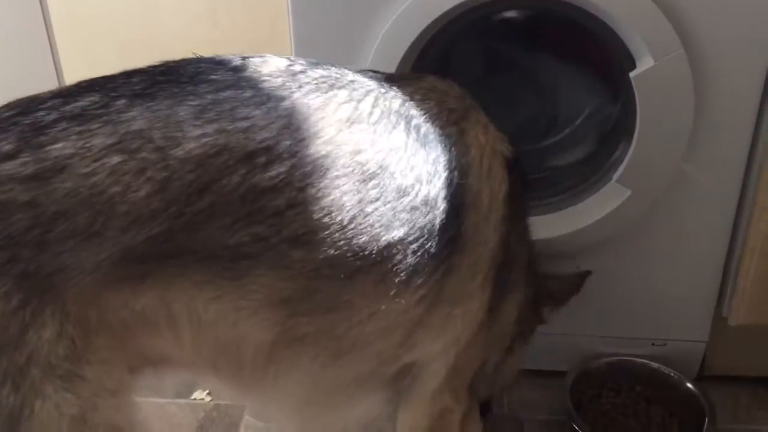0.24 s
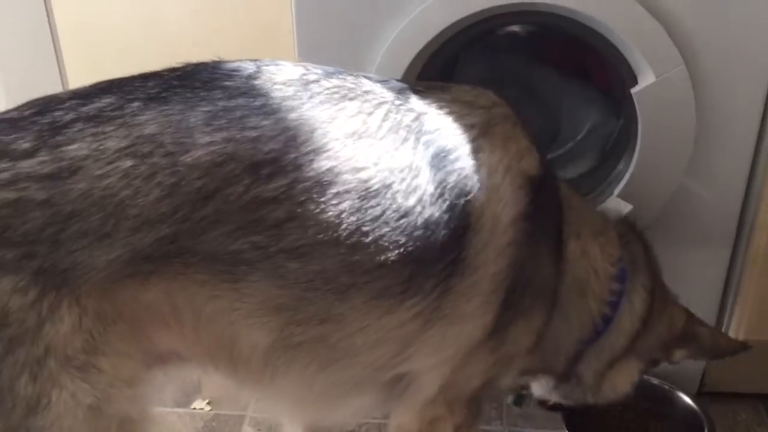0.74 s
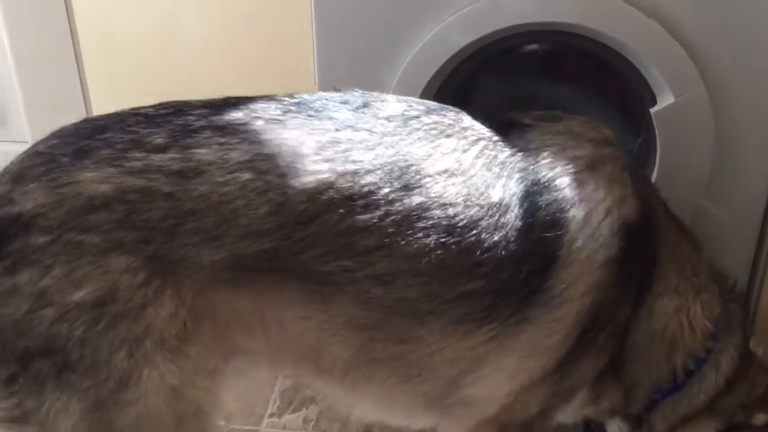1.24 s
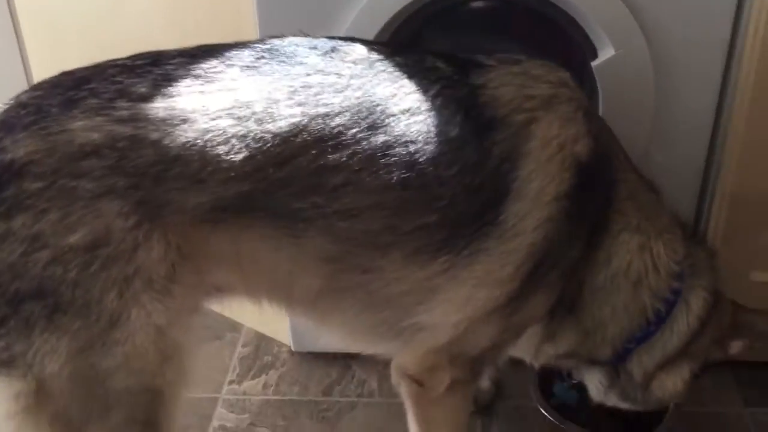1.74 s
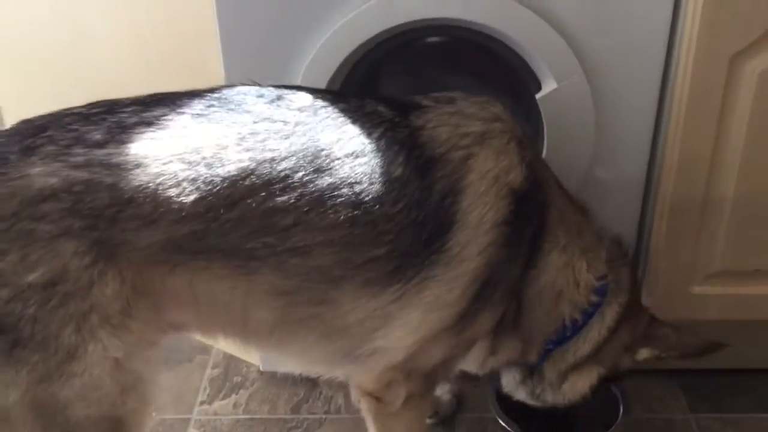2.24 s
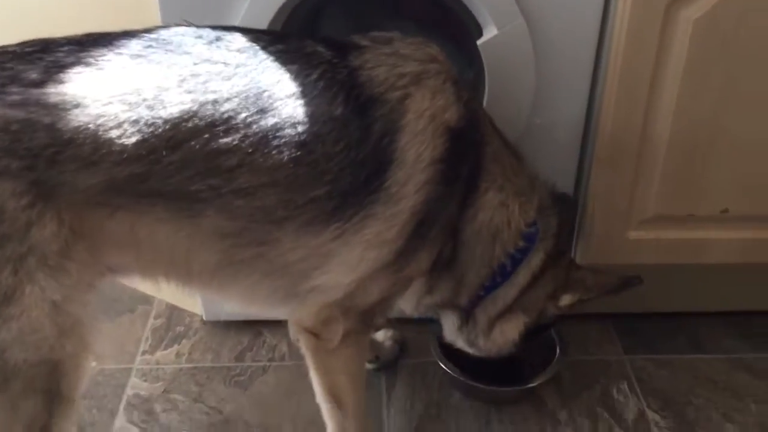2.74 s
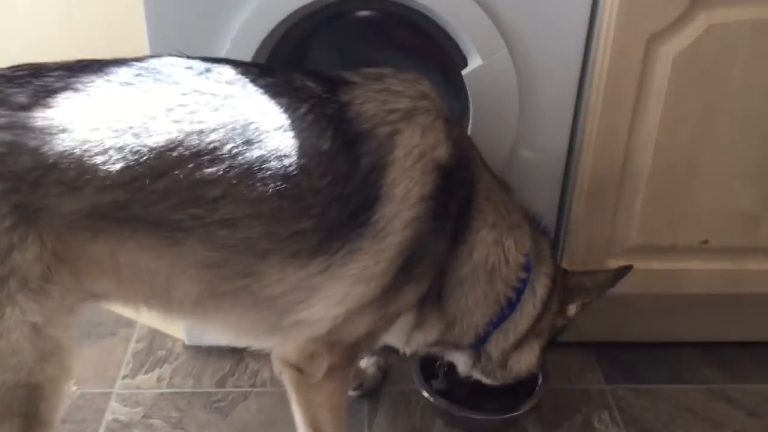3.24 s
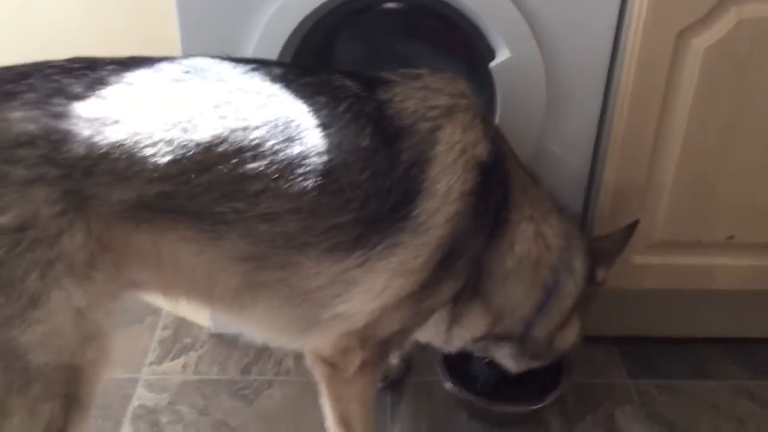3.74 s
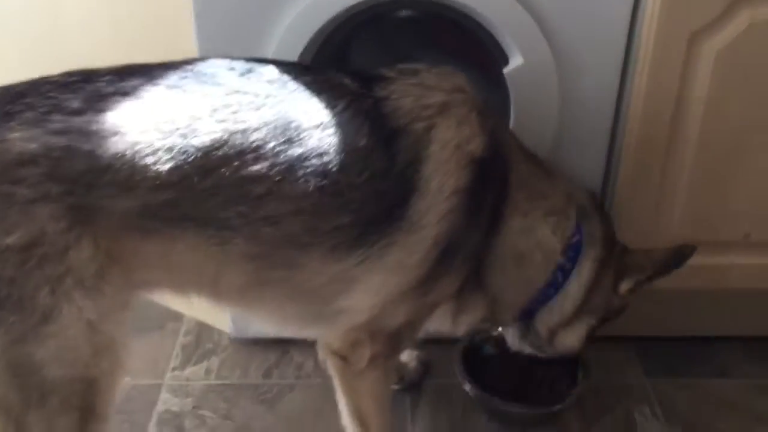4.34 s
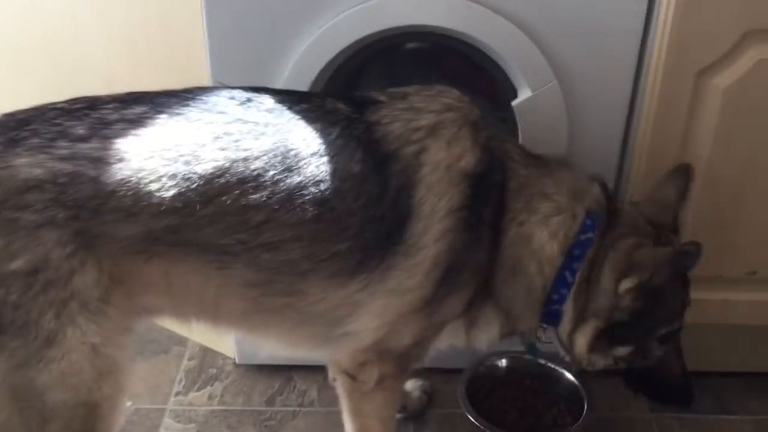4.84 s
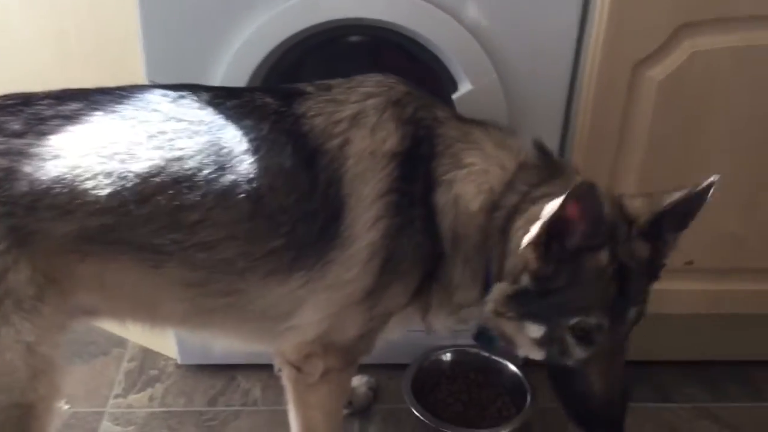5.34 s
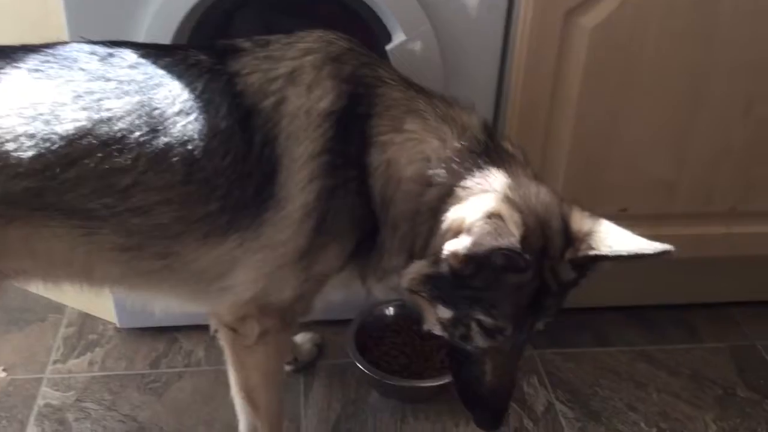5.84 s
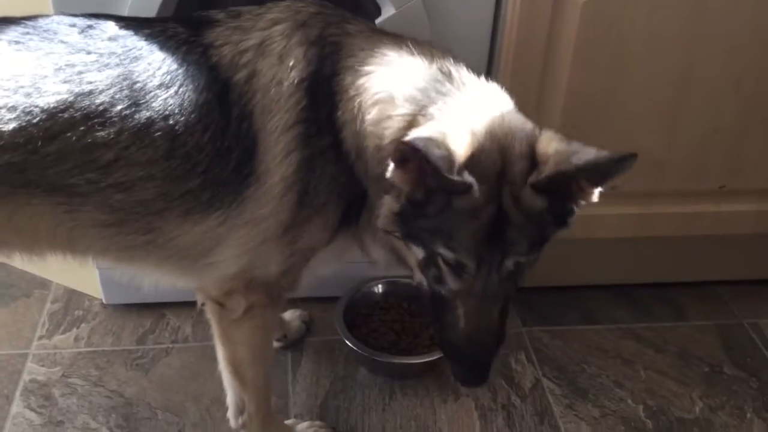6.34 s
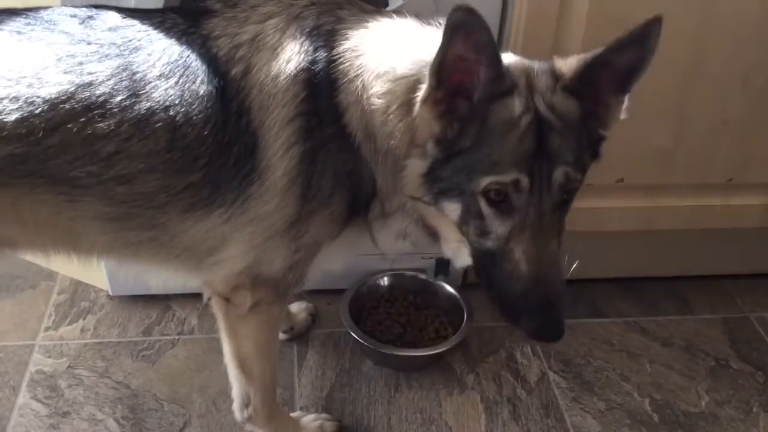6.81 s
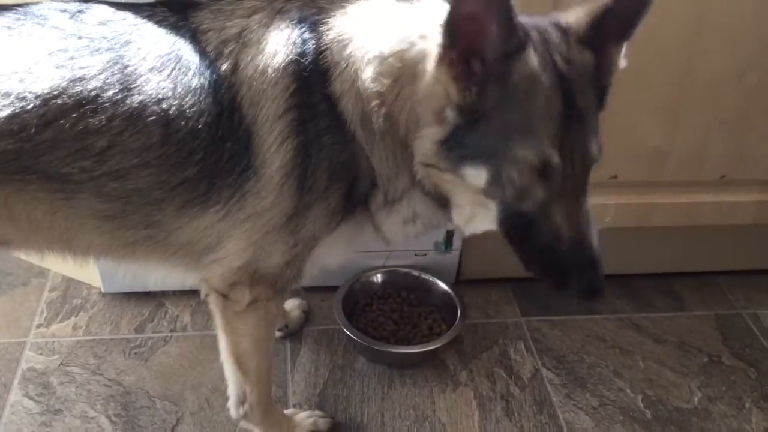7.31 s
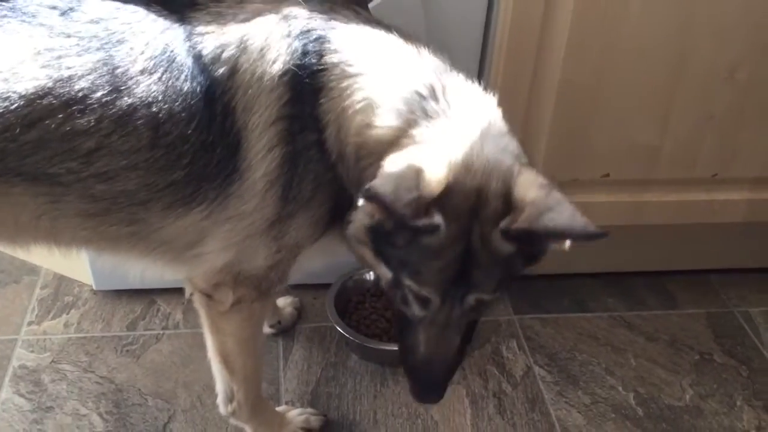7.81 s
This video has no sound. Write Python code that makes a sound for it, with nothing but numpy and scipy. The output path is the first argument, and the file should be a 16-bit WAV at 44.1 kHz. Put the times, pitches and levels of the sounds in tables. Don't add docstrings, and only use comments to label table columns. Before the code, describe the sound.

A close phone pickup in a small reverberant tiled kitchen with very faint fridge hum. From 0 to 0.6 s fur rustles, claws tick and a thin collar tag jingles very high and bright, strongest around 0.3 to 0.5 s. Small dry taps hit tile near 0.95 s; a soft paw pat lands at 1.35 s, and a faint, steady, high nasal whine lasts until about 2 s. From 2.1 to 4.2 s a muzzle pushes dry kibble round a steel bowl, an irregular, ringing, gritty clatter densest after 3.3 s. From 4.5 s, crunches turn low and hollow in the mouth. At 5.39 s a dropped piece cracks very loudly on tile, with smaller bounces from 5.66 to 5.97 s. Brittle crunches come around 6.1 to 6.35 s, a strong hissy snort at 6.45 s, a wheeze near 7 s, a weaker snort at 7.15 s, then quiet crunching around 7.7 s.

```python
import sys
import numpy as np
from scipy import signal
from scipy.fft import rfft, irfft
from scipy.io import wavfile
from scipy.ndimage import uniform_filter1d

SR = 44100
rng = np.random.default_rng(int(sys.argv[2]) if len(sys.argv) > 2 else 0)


def field_ratio(decibels):
    return 10 ** (np.asarray(decibels, dtype=float) / 20)


def inscribe(sig):
    pcm = np.round(np.clip(np.atleast_2d(sig).T, -1, 1) * 32767)
    wavfile.write(sys.argv[1], SR, pcm.astype(np.int16))


N = 355705


def evened(x):
    return x / np.sqrt(np.mean(x ** 2) + 1e-20)


def read(points, hz):
    f, value = np.transpose(points)
    return np.interp(np.log(hz + 1), np.log(f + 1), value)


def follow(rows):
    s, *columns = np.transpose(rows)
    at = np.arange(max(round(s[0] * SR), 0), min(round(s[-1] * SR), N))
    return at, [np.interp(at / SR, s, c) for c in columns]


def add(mix, s, sound):
    part = mix[..., round(s * SR):][..., :sound.shape[-1]]
    part += sound[..., :part.shape[-1]]


def causal(gain_db):
    log = np.log(field_ratio(np.maximum(gain_db, -100)))
    log = np.r_[log, log[-2:0:-1]]
    taps = np.fft.ifft(np.exp(np.conj(signal.hilbert(log)))).real[:1024]
    return taps / np.linalg.norm(taps)


def resonate(x, hz, width):
    turn = np.exp(2j * np.pi * np.cumsum(hz * np.ones(len(x))) / SR)
    r = np.exp(-np.pi * width / SR)
    return 2 * (turn * signal.lfilter([1 - r], [1, -r], x / turn + 1e-18)).real


def grit(per_s, spread_db, size):
    height = field_ratio(spread_db * np.minimum(rng.exponential(1, size), 3.0)) * rng.standard_normal(size)
    return evened(height * (rng.random(size) < per_s / SR))


SWELL_DB = 26


def gesture(s, rise, fall, db, hz=0, sag=(0, 0)):
    reach = 2.6
    early, late = reach * rise, reach * fall
    low_db = db - reach * SWELL_DB
    start = (s - early, low_db, max(hz + sag[0] * early, 100))
    end = (s + late, low_db, max(hz - sag[1] * late, 100))
    return [start, (s, db, hz), end]


def tilt(hz, low_db, top_db):
    low = 1 / (1 + (hz / 1100) ** 3)
    top = 1 / (1 + (6500 / (hz + 1)) ** 5)
    return low * low_db + top * top_db


def knocks(events, spectrum, crumb, crumble, ring_db, lift_db, thud_lift_db, snap_lift_db):
    out, t, hz = np.zeros(N), np.arange(1600) / SR, np.fft.rfftfreq(2048, 1 / SR)
    size = (len(events), 1600)
    crumbs = rng.standard_normal(size) * field_ratio(3.06 * np.minimum(rng.exponential(1, size), 2))
    rings = 1500 * 5 ** rng.random((len(events), 2, 1))
    for (s, db, thud_db, snap_db, break_db), grains, ring_hz in zip(events, crumbs, rings):
        swell_s = (0.07 + 0.026 * max(-break_db, 0)) * crumble
        blow = crumb * grains * np.exp(-t / crumble) * (1 - np.exp(-t / swell_s))
        blow *= 1 + 0.9 * field_ratio(min(break_db, 12)) * np.exp(-t / 0.002)
        blow[0] = field_ratio(min(break_db, 3))
        ring = ring_db * (1 / (1 + ((hz - ring_hz) / (0.038 * ring_hz)) ** 2)).sum(0)
        ends = tilt(hz, thud_db + thud_lift_db, snap_db + snap_lift_db)
        colour = causal(read(spectrum, hz) + ring + ends)
        add(out, s, field_ratio(db + lift_db) * signal.fftconvolve(blow, colour))
    return out


def pats(rows):
    out, t = np.zeros(N), np.arange(3000) / SR
    for s, db, hz, t60 in rows:
        onset = 1 - np.exp(-t / 0.00025)
        add(out, s, field_ratio(db + 8.5 - 60 * t / t60) * np.sin(2 * np.pi * hz * t) * onset)
    return out


def cavity(rows, width, clicks):
    at, (db, hz) = follow(rows)
    sound = resonate(resonate(clicks[at], hz, width), hz, 2 * width)
    return at[0] / SR, field_ratio(db) * evened(sound) * signal.windows.tukey(len(at), .05)


# f/Hz, level/dB
ROOM_TONE = [(25, -37), (60, -17.5), (130, -7.5), (400, -15), (1500, -11), (3000, -41.5), (16000, -32.5)]


def air():
    hz = np.fft.rfftfreq(N, 1 / SR)
    hiss = evened(irfft(rfft(rng.standard_normal(N)) * field_ratio(read(ROOM_TONE, hz)), N))
    waver = 1 + .1 * evened(uniform_filter1d(rng.standard_normal(N), 3000))
    hum = np.sqrt(2) * field_ratio(-76) * waver * np.sin(2 * np.pi * 79.3 * np.arange(N) / SR)
    return field_ratio(-77) * hiss + hum


# peak t/s, rise t/s, fall t/s, level/dB
BODY_BUMPS = [(0.599, 2.7, 1, -57), (1.6, 0.42, 0.32, -78), (2.11, 0.077, 0.25, -57), (3.75, .4, 0.43, -60),
              (4.468, 0.096, 0.62, -61), (5.43, 0.2, 0.6, -53.5), (5.9, 0.39, 0.099, -48),
              (6.17, 0.12, 0.85, -47.5), (6.839, 0.23, 0.86, -52.5), (7.951, 1.08, 0.11, -62)]


def body():
    power = np.zeros(N)
    for row in BODY_BUMPS:
        at, (db, _) = follow(gesture(*row))
        add(power, at[0] / SR, field_ratio(2 * db))
    lumps = resonate(resonate(grit(540, 2.2, size=N), 165, 130), 240, 97)
    return field_ratio(-4.5) * np.sqrt(power) * evened(lumps)


# peak t/s, rise t/s, fall t/s, effort level/dB, crispness level/dB
FUR_BRUSHES = [(0.01, 0.1, 0.63, -59.5, -2.5), (0.087, 0.0058, 0.39, -55, -9), (0.4, 0.2, 0.65, -57.5, 1.5),
               (0.801, 0.33, 0.14, -59, -11), (1.165, 0.031, 0.1, -52, -10),
               (1.319, 0.056, 0.031, -62, 2.5)]
# peak t/s, rise t/s, fall t/s, effort level/dB, crispness level/dB
BOWL_ROOTING = [
    (2.099, 0.038, 0.25, -50.5, -15),
    (2.369, 0.025, 0.75, -39.5, -8.5),
    (2.51, 0.17, 1, -42.5, -18.5),
    (3.17, 0.32, 0.56, -42.5, -36),
    (3.367, 0.24, 0.54, -35.5, -9),
    (3.732, 0.17, 0.29, -37.5, -12),
    (4.068, 0.03, 0.1, -33, -43),
    (4.19, 0.55, 0.15, -41.5, -15.5),
]
# peak t/s, rise t/s,
# fall t/s, effort level/dB, crispness level/dB
MOUTH_GRINDING = [(4.6, 0.29, 0.28, -54.5, 0), (4.78, 0.052, 0.064, -42, -54.5),
                  (4.954, 0.01, 0.18, -39.5, -19), (5.16, 0.22, 0.095, -42.5, -52),
                  (5.39, 0.2, 1.4, -53.5, -11), (5.72, .05, 0.29, -56.5, 9), (5.96, .15, 0.4, -47, -15),
                  (6.134, 0.012, 0.14, -58, -26), (6.289, 0.12, 0.02, -40.5, -34),
                  (6.782, 0.14, 0.13, -62, 1), (6.702, 0.013, 0.18, -47.5, -24),
                  (6.97, 0.03, 0.12, -51, -34), (7.08, 0.05, 0.022, -54.5, -61),
                  (7.22, 0.013, 0.49, -58.5, -17), (7.234, 0.065, 0.048, -60.5, 11),
                  (7.36, .1, 0.15, -75, 7), (7.47, 0.3, 0.2, -73.5, 10), (7.03, 0.15, 0.29, -71, 6),
                  (7.7, 0.15, 0.25, -60, -11.5)]


def strokes(hz, t):
    power = 1e-14
    dip = np.exp(-(np.log((hz[:, None] + 1) / 2300) / 0.17) ** 2)
    stages = ((FUR_BRUSHES, -2.5, -7), (BOWL_ROOTING, -12.5, 0), (MOUTH_GRINDING, -3, 0))
    for rows, dull_db, dip_db in stages:
        for s, rise, fall, db, crisp_db in rows:
            fading = abs((t - s) / fall) ** 1.36
            lost_db = SWELL_DB * np.where(t < s, (s - t) / rise, fading)
            shed_db = np.minimum(lost_db, 30)
            low_db = dull_db + 4 + 0.7309 * shed_db
            top_db = crisp_db + 4 + 0.3648 * shed_db
            colour_db = tilt(hz[:, None], low_db, top_db)
            power = power + field_ratio(2 * (db - np.minimum(lost_db, 150) + colour_db + dip_db * dip))
    return power


# f/Hz, level/dB
GRAIN_COLOUR = [(90, -52), (240, -2), (963, -8.5), (1790, -4), (2120, -6.5), (8510, -14), (15100, -24),
                (16500, -47.5)]


def rustle():
    hz, t, z = signal.stft(grit(7000, 2.2, size=N), SR, nperseg=256)
    shape_db = read(GRAIN_COLOUR, hz)
    shape_db = shape_db - 10 * np.log10(np.mean(field_ratio(2 * shape_db)))
    patches = uniform_filter1d(rng.standard_normal(z.shape), size=9, axis=0)
    patches = evened(uniform_filter1d(patches, size=6, axis=1))
    clumps = evened(uniform_filter1d(rng.standard_normal(len(t)), size=4))
    gain_db = -3.0 + shape_db[:, None] + 2.6 * patches + 1.2 * clumps
    coarse = np.repeat(strokes(hz[::4], t), 4, axis=0)[:len(hz)]
    return signal.istft(z * field_ratio(gain_db) * np.sqrt(coarse), SR, nperseg=256)[1][:N]


# t/s, peak level/dB, f/Hz, t60/s
PAW_PATS = [
    (0.031, -46, 383, 0.017),
    (1.347, -40.5, 610, 0.021),
    (7.096, -44.5, 1750, 0.016),
]


def paws():
    return pats(PAW_PATS)


# f/Hz, level/dB
CLAW_COLOUR = [(90, -42), (260, 2), (1500, -11), (2600, -17.5), (4000, -8), (8500, -14), (15300, -19.5),
               (16500, -54)]
# t/s, peak level/dB, thud level/dB, snap level/dB, first break level/dB
CLAW_TICKS = [(0.067, -46.5, -46, -29, 4), (0.1007, -41, -36, -17, -1), (0.1715, -36.5, -73, -6, 6),
              (0.2743, -27, -68, -16, -27), (0.3405, -32.5, -60, 9, 0), (0.392, -33, -30.5, 4, 6),
              (0.4314, -33, -55.5, -6, 1.5), (0.44, -28.5, -56.5, 4, -2.5), (0.4937, -33.5, -33, 8, 2),
              (0.605, -46, -46, -6, 2), (0.724, -45, -4, -47, -2.5), (0.7705, -46.5, 3, -51, 9),
              (0.789, -47, -9, -29, 9), (0.8057, -39.5, 11, 4, 4.5), (1.141, -33, -46, -6, -18),
              (1.162, -35.5, -50, -23, -10), (1.2394, -56, -30, -20, 20), (1.508, -57, -35, -34, -3),
              (1.7481, -56, -50, -19, 7), (1.935, -57.5, -23, -8, 4.5)]


def ticks():
    return knocks(CLAW_TICKS, CLAW_COLOUR, crumb=0.19, crumble=0.0099, ring_db=4.0,
                  lift_db=4.0, thud_lift_db=1.5, snap_lift_db=13.5)


# t/s, peak level/dB, lower mode level/dB, deep modes level/dB
TAG_STRIKES = [(0.145, -47, 9, 11), (0.169, -42, 20, -8), (0.1775, -31, 11, 0), (0.2732, -31, 16, 15),
               (0.3402, -18.5, 7.5, -1.5), (0.393, -21, 13, -7), (0.4008, -22.5, 12.5, 5),
               (0.4317, -30.5, -2, 8), (0.44, -25, 12.5, 5), (0.4928, -16, 0, -13), (0.6005, -39.5, 8.5, 1),
               (0.735, -51, -5, -3.5), (0.8094, -52, 3, -2.5), (1.075, -62, -5, -2), (1.306, -48.5, 5, -2),
               (1.42, -67.5, 12, 5), (1.513, -62, -3.5, 9), (1.932, -64, -9, -4.5),
               (5.215, -56.5, 11, -3.5)]
# f/Hz, level/dB, t60/s
TAG_MODES = [(11780, 1, 0.18), (10410, -6.5, 0.11), (15140, 2.5, .07), (8500, -22.5, 0.33),
             (3770, -16.5, 0.078)]


def tag():
    out, t = np.zeros(N), np.arange(9000) / SR
    turns = rng.random((len(TAG_STRIKES), 11))
    rattle = 1 + 0.31 * evened(uniform_filter1d(rng.standard_normal(N), size=150))
    for (s, db, lower_db, deep_db), turn in zip(TAG_STRIKES, turns):
        top_db = -0.33 * max(db + 49.5, 0)
        own_levels = (0, lower_db, top_db, deep_db, deep_db)
        for k, ((hz, mode_db, t60), own_db) in enumerate(zip(TAG_MODES, own_levels)):
            hz = hz * (1 + 0.0047 * (turn[10] - .5))
            pair = np.sin(2 * np.pi * (hz * t + turn[k]))
            pair = pair + 0.26 * np.sin(2 * np.pi * (hz * 1.007 * t + turn[5 + k]))
            decay = field_ratio(db - 9.5 + mode_db + own_db - 60 * t / t60)
            add(out, s, decay * pair * (1 - np.exp(-t / 0.0019)))
    return out * rattle


# f/Hz, level/dB
TILE_COLOUR = [(100, -60.5), (350, -12), (794, -19.5), (2200, -12.5), (3300, -0.5), (5800, -3),
               (12500, -14.5), (16800, -41)]
# t/s, peak level/dB, thud and snap level/dB re peak, first break level/dB
TILE_DROPS = [(0.9355, -28.5, -28, -6.5, -1), (0.9478, -21.5, -21, 1, 3.5), (0.9601, -21.5, -19, -0.5, 0.5),
              (0.9686, -26, -24, -47, 8), (5.3872, -3, -18.5, -3, 2.5), (5.661, -27, -24.5, -10.5, -4),
              (5.6766, -9.5, -17, -18, 2.5), (5.683, -20, -21, -33, -11), (5.8221, -28, -7, -16, 1),
              (5.8391, -13, -20.5, -20.5, 1.5), (5.844, -22, -22, -22, -4), (5.9276, -17.5, -17, -20, -3),
              (5.966, -20, -31, -15, 2), (5.9715, -32, -11, -12, -13)]


def drops():
    return knocks(TILE_DROPS, TILE_COLOUR, crumb=0.014, crumble=0.0019, ring_db=0.5,
                  lift_db=10.0, thud_lift_db=25.0, snap_lift_db=5)


# t/s, level/dB of partials 1, 2 and 3
WHINE_PARTIALS = [(1.33, -70, -100, -105), (1.46, -79.5, -70, -77), (1.5, -71.5, -71, -73),
                  (1.56, -63.5, -66.5, -69.5), (1.65, -68, -64.5, -100), (1.74, -65, -75, -87.5),
                  (1.82, -62.5, -92.5, -105), (1.865, -64.5, -67, -105), (2.055, -76, -108, -105)]
# t/s, f/Hz, level/dB
SIDE_WHISTLES = [
    [(1.48, 2220, -115), (1.566, 2200, -67.5), (1.75, 2240, -76.5)],
    [(1.32, 2590, -77), (1.394, 2560, -65), (1.5, 2630, -101)],
    [(1.35, 2880, -71), (1.51, 2860, -78), (1.6, 2870, -74.5), (1.63, 2870, -89.5)],
    [(1.34, 5380, -69), (1.45, 5430, -81.5), (1.52, 5400, -82)],
]


def whine():
    out = np.zeros(N)
    for rows in (np.insert(WHINE_PARTIALS, 1, 2107, axis=1), *SIDE_WHISTLES):
        at, (hz, *levels) = follow(rows)
        wander_hz = 3.8 * evened(uniform_filter1d(rng.standard_normal(len(at)), 600))
        turns = np.cumsum(hz + wander_hz) / SR
        flutter = field_ratio(1.4 * evened(uniform_filter1d(rng.standard_normal(len(at)), size=900)))
        sound = np.zeros(len(at))
        for k, db in zip((1, 2, 3.04), levels):
            sound += np.sqrt(2) * field_ratio(db) * np.sin(2 * np.pi * k * turns)
        add(out, at[0] / SR, flutter * sound * signal.windows.tukey(len(at), .15))
    return out


# t/s, peak level/dB, thud level/dB, snap level/dB, first break level/dB
BOWL_CLACKS = [(2.0788, -54, -7, -19, 5), (2.0989, -42.5, -0.5, -15, 1.5), (2.1698, -46, -7.5, -15, 2),
               (2.179, -34.5, -7, -11, -4), (2.3424, -38.5, -23, -35, 2), (2.357, -21, -30, -23, -26),
               (2.377, -35.5, -40, -23, 7), (2.4502, -21, -9, -13, -19), (2.4867, -19, -15, -20.5, -2),
               (2.524, -24.5, -13.5, -14.5, 18), (2.5364, -25.5, -11, -13, 2),
               (2.5569, -27, -16, -17.5, 3.5), (2.676, -31, -3, -10, 12), (2.6926, -20.5, -53, -18, -14),
               (2.7633, -25, -40, -17, 10), (2.831, -31.5, -20, -16, 3), (2.9158, -34, -16, -33, 9),
               (2.9524, -32.5, -15, -22, 13), (3.035, -31, -20, -11, 8.5), (3.0857, -28, -15, -23, 21),
               (3.1493, -26.5, -31, -17.5, 6), (3.1775, -22, -18.5, -14.5, 5),
               (3.2999, -27, -10.5, -16, -2), (3.335, -24, -16.5, -19, 7), (3.3598, -14, -18, -15, -4),
               (3.431, -22.5, -20.5, -13, 12), (3.5031, -16, -32.5, -15.5, -4.5),
               (3.556, -21.5, -22, -23, 1), (3.586, -33, -36, -19, 10), (3.6989, -23, -10.5, -16, 17),
               (3.7259, -19.5, -14, -9.5, 12), (3.7387, -18, -14, -17, 17), (3.769, -22.5, -14.5, -13, 6.5),
               (3.8421, -25, -35, -19, 6.5), (3.927, -34, -23, -23, -6), (4.0066, -32.5, -11, -28, 16),
               (4.0274, -25.5, -12, -21, 2), (4.0468, -24.5, -16, -19, 8.5),
               (4.0876, -18.5, -29, -14.5, 12)]
# t/s, peak level/dB, thud level/dB,
# snap level/dB, first break level/dB
LAST_CLACKS_AND_BITES = [(4.1746, -27.5, -21, 5, 9), (4.257, -37.5, -21, -21, 0), (4.332, -37.5, -29, -35, 3.5),
                         (4.4703, -52.5, -15, 1, 12), (4.523, -45, -16, 10, 5), (4.563, -32, -31, -13.5, 2),
                         (4.59, -28.5, -12.5, -22, -4), (4.6481, -27.5, -3, -23, -2.5),
                         (4.6852, -26.5, -8, -13.5, -2.5), (4.7191, -27, 0, -19, 2), (4.7734, -29, 3, -17.5, -0.5),
                         (4.842, -34.5, 7, -33.5, 6), (4.955, -31, 8, -30.5, -2.5), (5.0279, -27, 0, -41.5, -2),
                         (5.1281, -25.5, 8.5, -34.5, -0.5), (5.3139, -41, -19.5, -53, 0), (5.6095, -38.5, 3, 16, 2),
                         (6.1286, -22.5, -22, -41, -4.5), (6.193, -29, -32, -53, -3.5), (6.24, -44.5, -22, 7, -1),
                         (6.27, -28.5, -33, -5.5, -7.5), (6.282, -34, -6, -13.5, -8), (6.3291, -34.5, 8, -14, 11),
                         (6.357, -29.5, -3.5, -65, 4), (6.669, -37.5, -39, -66, 3.5), (6.7126, -36, -18, -12, -6),
                         (6.8139, -33, -2.5, -39, 11), (6.843, -32.5, -4.5, -23, 7), (6.929, -39, -45, -8, 0),
                         (6.9598, -38.5, -6, -13, 3), (7.645, -54, -21.5, -12, -7.5), (7.737, -36.5, 1.5, -27, -7.5)]


def kibble():
    clacks = [(s, db - 4, *rest) for s, db, *rest in BOWL_CLACKS]
    return knocks(clacks + LAST_CLACKS_AND_BITES, GRAIN_COLOUR, crumb=0.2, crumble=0.015, ring_db=1.0,
                  lift_db=1.5, thud_lift_db=6.0, snap_lift_db=17.0)


# f/Hz, width f/Hz, level/dB
BOWL_MODES = [(1725, 200, -2), (4700, 41, -9), (5100, 64, 0.5), (5740, 86, 10), (6150, 390, 10),
              (8900, 660, 8)]


def bowl(x):
    at, (inside,) = follow([(2.0, 0), (2.05, 1), (4.36, 1), (4.45, 0), (4.6, 0)])
    out = x.copy()
    for hz, width, db in BOWL_MODES:
        add(out, at[0] / SR, field_ratio(db - 11.5) * resonate(x[at] * inside, hz, width))
    return out


# t/s, peak level/dB, f/Hz, t60/s
JAW_AND_BOWL_TAPS = [(2.104, -53, 5010, 0.075), (2.18, -55, 4550, 0.11), (4.474, -55.5, 4680, .03),
                     (4.653, -52.5, 335, .03), (4.69, -46, 777, 0.055), (4.724, -47.5, 309, 0.039),
                     (4.784, -45.5, 306, 0.041), (4.844, -50.5, 290, 0.038), (4.564, -45, 4860, .04),
                     (4.723, -45, 4465, .04), (4.722, -43.5, 2280, .04)]


def taps():
    return pats(JAW_AND_BOWL_TAPS)


# peak t/s, rise t/s, fall t/s, level/dB, cavity f/Hz
LOW_CAVITY = [(4.475, 0.033, 0.047, -60, 250), (4.712, 0.081, 0.35, -60, 353),
              (4.969, 0.023, 0.21, -38, 384), (5.133, 0.037, 0.084, -39, 490),
              (5.413, 0.018, 0.19, -38.5, 482), (5.598, 0.52, 0.37, -48, 377),
              (7.001, 0.31, 0.21, -52.5, 336), (7.411, 0.37, 0.27, -61.5, 366),
              (7.761, 0.18, 0.32, -57, 367)]
# peak t/s, rise t/s, fall t/s, level/dB, cavity f/Hz
UPPER_CAVITY = [
    (4.704, 0.13, 0.25, -47.5, 783),
    (5.034, 0.0073, 0.03, -26, 1140),
    (6.322, 0.11, 0.18, -45, 650),
    (6.856, 0.025, 0.022, -39, 1083),
    (7.228, 0.038, 0.21, -57.5, 1090),
]


def chewing(grinding):
    out = np.zeros(N)
    for row in LOW_CAVITY:
        add(out, *cavity(gesture(*row, (-200, 230)), 97, grinding))
    for row in UPPER_CAVITY:
        add(out, *cavity(gesture(*row, (800, 460)), 130, grinding))
    return out


# peak t/s, rise t/s, fall t/s, level/dB, cavity f/Hz
OPEN_CHOMPS = [(6.133, 0.023, 0.14, -37, 3040), (6.201, .015, 0.074, -41.5, 2230),
               (6.285, 0.012, 0.064, -38.5, 2477), (7.585, 0.069, 0.047, -66, 2960),
               (7.684, 0.014, 0.015, -53.5, 2350), (7.675, 0.037, 0.056, -69.5, 5700),
               (7.7, 0.011, 0.014, -52.5, 2475), (7.741, 0.012, 0.015, -41.5, 2300)]


def chomps():
    out, crumbs = np.zeros(N), grit(4000, 3.5, size=N)
    for row in OPEN_CHOMPS:
        add(out, *cavity(gesture(*row), 970, crumbs))
    return out


# t/s, level/dB
SNORT_BREATHS = [
    [(6.395, -68.5), (6.43, -38), (6.5, -34.5), (6.62, -65)],
    [(7.1, -56), (7.13, -44), (7.2, -46.5), (7.33, -60.5)],
]
# f/Hz, width f/Hz, level/dB, shift at the start f/Hz
NOSE_PASSAGES = [
    [(2200, 25.6, -6, 139), (2385, 41, -6.5, 46.5), (2887, 15, -2, 29.5), (3580, 200, -23, -0.5), (4366, 30, -8, 300), (4650, 30, -12, 600), (5740, 250, -12.5, 100), (6650, 380, -14.5, 500), (8730, 450, -10.5, -200), (11700, 140, -12, -100), (14400, 400, -14, 0)],
    [(2230, 71, -1, -100), (2476, 74, -3, 1), (4604, 12, -5.5, -200), (5130, 39, -10.5, -48), (5470, 45, -17.5, 3.5), (6830, 97, -5.5, -350), (7970, 71, -14, -300), (8940, 66, -17, -400), (10600, 78, -12, 0.5), (12900, 150, -12, 300), (14800, 200, -15, 0)],
]
# glide t/s, hiss share, widening in Hz per Hz
NOSTRIL_FLARES = [
    (.06, 0.31, 0.018),
    (.09, 0.25, 0.0074),
]


def snorts():
    out = np.zeros(N)
    low_pass = signal.butter(10, 15900, fs=SR, output="sos")
    for rows, passages, (glide, hiss, widen) in zip(SNORT_BREATHS, NOSE_PASSAGES, NOSTRIL_FLARES):
        at, (db,) = follow(rows)
        breath, t = rng.standard_normal(len(at)), np.arange(len(at)) / SR
        spray = resonate(resonate(grit(6000, 2.0, size=len(at)), 11300, 3500), 11000, 3500)
        sound = hiss * spray * np.exp(-t / 0.16)
        for hz, width, g_db, shift in passages:
            path, wide = hz + shift * np.exp(-t / glide), width + widen * hz
            passage = evened(resonate(resonate(breath, path, wide), path, 2 * wide))
            sound = sound + field_ratio(g_db - 0.01 * hz * t) * passage
        sound = evened(signal.sosfilt(low_pass, sound))
        add(out, at[0] / SR, field_ratio(db - 3.5) * sound * signal.windows.tukey(len(at), .1))
    return out


# t/s, level/dB, f/Hz
NOSTRIL_WHEEZE = [
    (6.94, -69, 2664),
    (6.97, -49.5, 2740),
    (7.11, -73, 2630),
]


def wheeze(grinding):
    out = np.zeros(N)
    add(out, *cavity(NOSTRIL_WHEEZE, 63, grinding))
    return out


# f/Hz, t60/s
ROOM_DECAY = [(200, 0.55), (530, 0.31), (1390, 0.73), (3680, 0.54), (9700, 0.35), (12500, 0.2),
              (15500, 0.19)]


def kitchen(x):
    size = SR * 3 // 4
    echoes = np.zeros((3, size))
    at = np.arange(60, size - 12, 12) + rng.integers(0, 12, (3, (size - 61) // 12))
    np.put_along_axis(echoes, at, rng.choice([-1., 1.], at.shape), 1)
    hz, t, z = signal.stft(echoes, SR, nperseg=128)
    near_walls = 1 + 1.8 * np.exp(-t / 0.0061)
    decay = field_ratio(-60 * t / read(ROOM_DECAY, hz)[:, None]) * near_walls
    tails = signal.istft(z * decay, SR, nperseg=128)[1]
    turn = np.arange(N) / SR * 9 + np.arange(3)[:, None] * np.pi / 3
    fed = x * np.cos(turn) * np.sqrt(2 / 3)
    return signal.fftconvolve(fed, tails / np.linalg.norm(tails[0]), axes=1)[:, :N].sum(0)


def scene():
    grinding = grit(1200, 3.4, size=N)
    on_tiles = drops()
    muzzle = bowl(rustle() + kibble() + ticks()) + body() + chewing(grinding) + chomps()
    nose = tag() + paws() + taps() + snorts() + wheeze(grinding)
    wet = kitchen(field_ratio(4.0) * on_tiles + field_ratio(-5.5) * muzzle + field_ratio(-7.0) * nose)
    small = signal.butter(4, 120, "high", fs=SR, output="sos")
    return (signal.sosfilt(small, on_tiles + muzzle + nose + whine() + wet) + air())[None]


def band_limit(x):
    return signal.sosfilt(signal.butter(12, 16980, fs=SR, output="sos"), x)


# f/Hz, level/dB a bin
SUPPRESSOR = [(300, -100), (1500, -90.5), (3500, -86), (15000, -100)]


def record(dry):
    x = signal.sosfilt(signal.butter(2, 70, "high", fs=SR, output="sos"), dry)
    hz, t, z = signal.stft(x, SR, nperseg=512, noverlap=384)
    power = uniform_filter1d(uniform_filter1d(abs(z) ** 2, size=7, axis=1), size=5, axis=2) + 1e-20
    keep = np.maximum(1 - field_ratio(2 * read(SUPPRESSOR, hz))[:, None] / power, .12)
    x = signal.istft(z * keep, SR, nperseg=512, noverlap=384)[1][:, :N]
    low_pass = signal.butter(12, 15800, fs=SR, output="sos")
    x = x + field_ratio(-89) * signal.sosfilt(low_pass, rng.standard_normal(x.shape))
    return band_limit(np.clip(x, -.94, .94))


dry = scene()
out = record(dry)
inscribe(out)
```